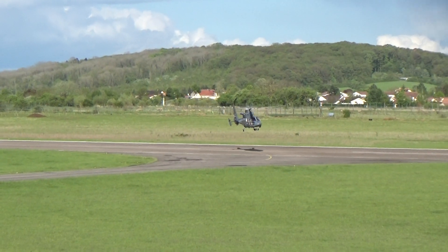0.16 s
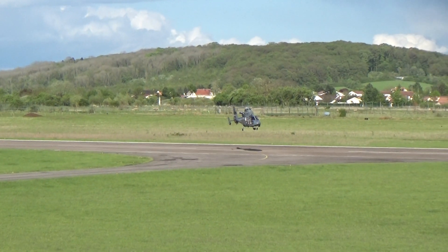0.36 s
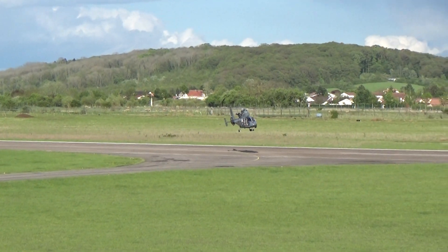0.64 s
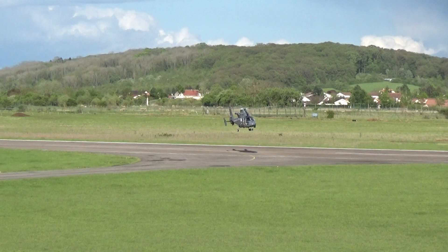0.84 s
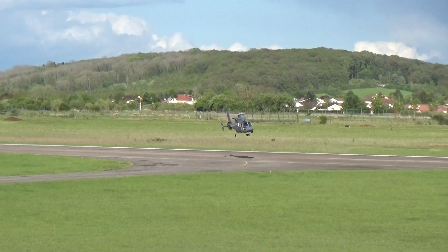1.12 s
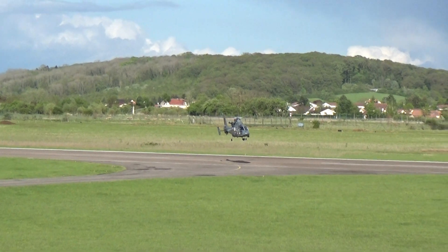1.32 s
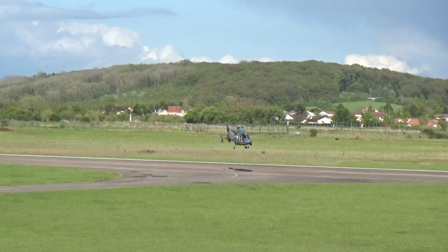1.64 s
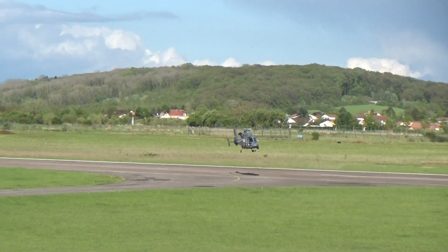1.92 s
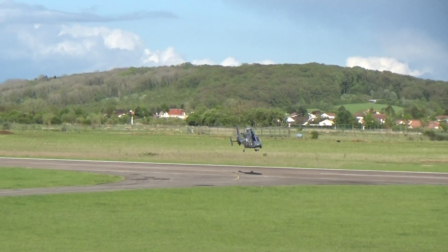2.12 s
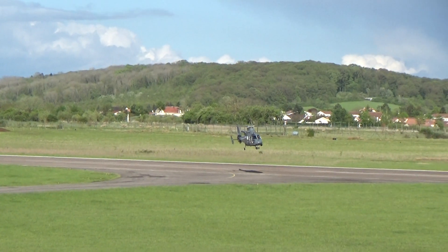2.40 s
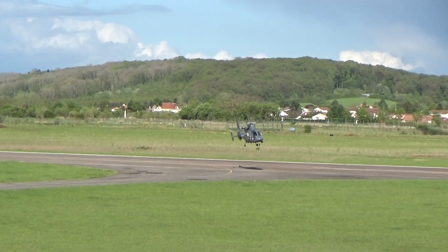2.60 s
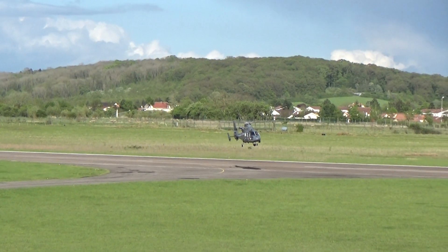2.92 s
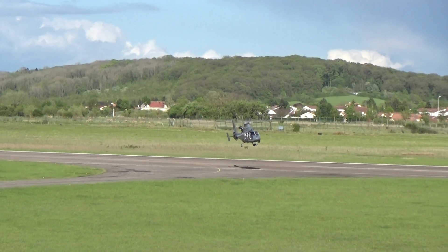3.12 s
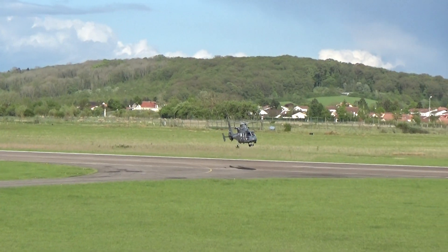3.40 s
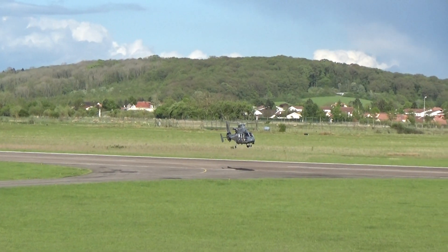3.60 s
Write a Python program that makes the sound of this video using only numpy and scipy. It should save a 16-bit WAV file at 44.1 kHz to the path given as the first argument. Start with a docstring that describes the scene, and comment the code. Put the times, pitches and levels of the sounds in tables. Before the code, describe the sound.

A helicopter hovers some way off, its blades beating rapidly over rushing air and a thin turbine whine. The blade slap is sharpest from about 0.6 to 1.2 seconds. Wind buffets the microphone throughout with uneven low thumps, swelling to a hard, crackling gust from 2.8 to 3.1 seconds; afterwards the sound is thinner and the helicopter quieter. A small bird chirps faintly around 2.2 seconds.

```python
"""An airfield, a turbine helicopter hovering low some way off. Its blades pass 24 times a second: a swish,
a slap as they cut their own wake, a dry tip rasp, over rotor wash, gear whine and turbine notes.
Wind eddies buffet the microphone and swell to one hard, crackling gust; wind and helicopter lose their
bass from there on. A small bird chirps faintly over hiss and ticks. A limiter holds the peaks."""
import sys
import numpy as np
from scipy import signal
from scipy.fft import rfft, irfft
from scipy.io import wavfile
from scipy.ndimage import uniform_filter1d

SR = 44100
rng = np.random.default_rng(int(sys.argv[2]) if len(sys.argv) > 2 else 0)


def log_audio(samples):
    """Write samples as a 16-bit WAV file to the path given in sys.argv[1]."""
    # one column per channel
    frames = np.atleast_2d(samples).T
    # limit to full scale, then quantise
    limited = np.clip(frames, -1, 1)
    pcm = np.round(limited * 32767).astype(np.int16)
    wavfile.write(sys.argv[1], SR, pcm)


N = 165375
TIME = np.arange(N) / SR
BLADE_HZ = 24.05

# blade swish peaks: time_s, level_db
SWISH_LEVEL = [(0, -30.5), (.15, -29.5), (.42, -38), (.6, -28), (.78, -25.5), (1.0, -27), (1.22, -25.5),
               (1.45, -30.5), (1.7, -28), (1.9, -33.5), (2.2, -30), (2.6, -34.5), (2.9, -30.5), (3.2, -42),
               (3.75, -36)]
# swish spectrum: freq_hz, level_db
SWISH_COLOUR = [(60, 5.5), (250, 4.5), (380, -5), (490, 7), (590, -9), (720, 5), (950, -1), (1150, -4),
                (1400, -7), (1650, -7), (1900, -9), (2800, -14), (4000, -28), (5000, -40.5), (8000, -52.5)]
# wake slap peaks: time_s, level_db
SLAP_LEVEL = [(.45, -48), (.62, -24), (.675, -18), (.78, -16.5), (.85, -25.5), (1.0, -24), (1.2, -41),
              (1.4, -35.5), (2.2, -65)]
# slap spectrum: freq_hz, level_db
SLAP_COLOUR = [(60, -15), (260, 14), (370, 2.5), (490, 12.5), (590, -16.5), (720, 12), (900, 2),
               (1200, -17), (2200, -32.5), (4500, -42.5), (8000, -65.5)]
# tip rasp peaks: time_s, level_db
TIP_LEVEL = [(.5, -73), (.8, -39), (.98, -34.5), (1.2, -38), (1.5, -57)]
# tip rasp spectrum: freq_hz, level_db
TIP_COLOUR = [(700, -33), (1200, -15), (1400, 4), (1680, 5), (1900, -21.5), (2700, -13.5), (5000, -49.5),
              (8000, -72.5)]
# rotor wash and engine noise: time_s, level_db
WASH_LEVEL = [(0, -45.5), (.3, -35.5), (.55, -35.5), (1.0, -34.5), (1.45, -36), (1.85, -39), (2.1, -32.5),
              (2.3, -35), (2.6, -34.5), (2.8, -38), (3.1, -43), (3.2, -41), (3.5, -46), (3.75, -42.5)]
# wash spectrum: freq_hz, level_db
WASH_COLOUR = [(25, 7.5), (60, -3), (120, 2), (250, -1), (400, -10.5), (550, -5), (750, -6), (1000, -5.5),
               (1130, -7.5), (1450, -11.5), (1850, -14.5), (2250, -16.5), (2600, -21.5), (3200, -29),
               (4200, -33), (5000, -46), (8000, -53)]
# gear tones: pitch_hz
GEAR_HZ = [1046, 1015, 1421, 1675]
# band of each gear tone: width_hz, relative_db
GEAR_BANDS = [(8.7, -4.5), (30.4, -5), (35, -13.5), (11.9, -14.5)]
# gear whine: time_s, level_db
GEAR_LEVEL = [(.4, -41.5), (.6, -48), (1.4, -49), (1.8, -42), (2.1, -36.5), (2.35, -40.5), (2.8, -42.5),
              (3.2, -51)]
# turbine note: time_s, level_db
TURBINE_LEVEL = [(0, -50), (.35, -62), (.45, -42.5), (.55, -54), (.7, -43), (.95, -60), (1.15, -49),
                 (1.5, -50.5), (1.9, -58), (2.3, -50.5), (2.45, -54), (2.72, -44.5), (2.95, -53.5),
                 (3.2, -56), (3.75, -60)]
# breathy band above it: time_s, level_db
TURBINE_TOP_LEVEL = [(0, -65), (.3, -57.5), (.8, -70), (1.7, -66), (2.1, -59.5), (2.65, -54.5), (3.2, -65),
                     (3.75, -63.5)]

# wind on the microphone: time_s, strength_db
WIND_LEVEL = [(0, -30.5), (.045, -33.5), (.095, -32.5), (.135, -18.5), (.17, -36), (.235, -29.5),
              (.28, -24.5), (.39, -25), (.47, -27.5), (.6, -29), (.85, -37), (1.0, -38.5), (1.235, -28),
              (1.275, -21.5), (1.315, -30), (1.39, -32), (1.47, -18.5), (1.6, -25.5), (1.65, -36),
              (1.7, -27.5), (1.83, -25), (1.89, -30), (1.97, -24.5), (2.12, -30.5), (2.17, -59),
              (2.265, -36.5), (2.29, -23.5), (2.35, -19), (2.505, -23.5), (2.53, -39), (2.73, -42),
              (2.79, -26.5), (2.85, -16), (3.125, -16), (3.24, -25), (3.36, -24), (3.41, -30.5),
              (3.47, -22.5), (3.53, -30.5), (3.6, -29.5), (3.65, -37), (3.68, -25), (3.75, -29.5)]
# wind spectrum: freq_hz, level_db
WIND_COLOUR = [(25, -4), (60, -2.5), (95, 0.5), (145, 0.5), (240, -2), (470, -9.5), (720, -20), (1200, -41),
               (2000, -44.5), (3500, -71), (8000, -103.5)]
# single eddies: start_s, level_db, pitch_hz
THUMPS = [(0.131, -10, 151), (0.331, -10, 129), (0.374, -13, 144), (1.076, -9, 131), (1.208, -9, 176),
          (1.263, -13.5, 160), (1.27, -11.5, 147), (1.285, -7.5, 155), (1.436, -12, 130),
          (1.455, -12.5, 158), (1.488, -11.5, 120), (1.578, -12, 146), (1.605, -11, 162),
          (1.687, -10.5, 151), (1.779, -9, 192), (1.827, -10.5, 111.5), (1.936, -20, 171),
          (1.983, -14.5, 135), (2.292, -10, 145), (2.805, -11.5, 88)]
# gust roar: time_s, level_db
ROAR_LEVEL = [(2.2, -47), (2.34, -35), (2.5, -27.5), (2.55, -58), (2.81, -42.5), (2.835, -19), (2.9, -26.5),
              (2.925, -15.5), (3.02, -17.5), (3.125, -14.5), (3.16, -25.5), (3.24, -33), (3.35, -29),
              (3.42, -44.5), (3.75, -53)]
# roar spectrum: freq_hz, level_db
ROAR_COLOUR = [(40, -40), (150, -0.5), (300, 2), (470, 0.5), (750, -10.5), (1270, -14.5), (1600, -29.5),
               (4000, -53), (8000, -77)]
# gust crackles: start_s, level_db
CRACKLES = [(2.863, -25), (2.875, -21.5), (3.069, -17.5)]
# crackle spectrum: freq_hz, level_db
CRACKLE_COLOUR = [(200, -20.5), (1200, 12), (3000, -12), (6000, -30.5), (9000, -54)]

# bird notes: start_s, length_s, from_hz, to_hz, level_db
CHIRPS = [(.165, 0.081, 5150, 5750, -65), (2.198, 0.046, 5200, 5720, -52), (3.33, 0.051, 5250, 5500, -69)]
# treble hiss: time_s, level_db
HISS_LEVEL = [(0, -65.5), (1.2, -67), (1.5, -68), (2.7, -67), (3.2, -68.5), (3.5, -68)]
# hiss spectrum: freq_hz, level_db
HISS_COLOUR = [(1000, -7), (5000, -0.5), (7000, 5), (8500, -2.5), (11000, -5), (13000, -3.5),
               (16000, -14.5)]
# electronic tones: pitch_hz, level_db
ELECTRONIC_TONES = [(13119, -93), (15625, -95.5)]
# faint close ticks: start_s, level_db
TICKS = [(.273, -63), (.39, -59), (.63, -58.5), (.69, -61), (2.929, -61.5), (3.476, -59), (3.604, -61),
         (3.677, -59), (3.704, -62)]
# tick spectrum: freq_hz, level_db
TICK_COLOUR = [(3000, -36), (5500, -17), (7000, -4), (9500, -15), (12500, -14), (16000, -33)]

# low edge of wind and helicopter: time_s, cutoff_hz
LOW_EDGE = [(0, 28), (2.2, 31.6), (2.42, 89.4), (2.6, 60.7), (2.8, 48.8), (2.95, 270), (3.3, 294),
            (3.75, 210)]
# stereo width: freq_hz, side_minus_mid_db
STEREO_WIDTH = [(60, -24), (150, -35), (300, -18.5), (1000, -25.5), (2500, -20), (5000, -23.5),
                (8000, -9.5), (12000, -19)]
# microphone port balance: freq_hz, left_minus_right_db
PORT_BALANCE = [(60, -1), (125, -1), (300, 1.9), (600, 0.5), (1100, 1.13), (2200, 1.44), (4000, -0.5)]


def helicopter():
    """Wash, gears and turbine under the swish, wake slap and tip rasp of the blades."""
    steady = rotor_wash() + gear_whine() + turbine()
    swish = blades(SWISH_LEVEL, SWISH_COLOUR, attack_s=.011, decay_s=.013, repeat_share=.28)
    slap = blades(SLAP_LEVEL, SLAP_COLOUR, attack_s=.0035, decay_s=.0062, repeat_share=.6)
    tips = blades(TIP_LEVEL, TIP_COLOUR, attack_s=.011, decay_s=.028, repeat_share=.28)
    return steady + swish + slap_sweep(slap) + tips


def blades(level, colour, attack_s, decay_s, repeat_share, peak_after_s=.0054, jitter_s=.0007):
    """One burst per blade pass: part repeating pressure wave, part fresh turbulence."""
    pass_s = .0002 + np.arange(int(N / SR * BLADE_HZ) + 1) / BLADE_HZ
    late, louder = rng.standard_normal((len(pass_s), 2)).T
    start_s = pass_s + peak_after_s - attack_s + jitter_s * late
    peak_db = np.interp(pass_s, *np.transpose(level)) + .7 * louder
    repeating = np.resize(rng.standard_normal(int(SR / BLADE_HZ)), N)
    source = np.sqrt(repeat_share) * repeating + np.sqrt(1 - repeat_share) * rng.standard_normal(N)
    eddies = from_db(4.5 * np.tanh(drift(340)))
    rasp = evened(coloured(colour, source * eddies), share=.6, window_samples=500)
    return rasp * bursts(zip(start_s, peak_db), attack_s, decay_s)


def slap_sweep(x, s_per_octave=.00247):
    """Midrange dispersion: the bass of a slap arrives before its treble."""
    hz = np.fft.rfftfreq(N, 1 / SR)
    delay_s = s_per_octave * np.log2(np.clip(hz, 200, 1400) / 750)
    return irfft(rfft(x) * np.exp(-2j * np.pi * np.cumsum(delay_s) * SR / N), N)


def rotor_wash(flutter_db=1.4):
    """Broadband downwash and engine noise, lightly fluttering."""
    return coloured(WASH_COLOUR) * from_db(in_time(WASH_LEVEL) + flutter_db * drift(21))


def gear_whine(flutter_db=4):
    """Four narrow gear tones, fluttering on the moving air."""
    tones = sum(from_db(db) * wavering(hz, width_hz) for hz, (width_hz, db) in zip(GEAR_HZ, GEAR_BANDS))
    flutter = rms_one(from_db(flutter_db * np.tanh(drift(35))))
    return tones * from_db(in_time(GEAR_LEVEL)) * flutter


def turbine():
    """A smeared high note and a breathy band above it, both wandering in pitch."""
    note = from_db(in_time(TURBINE_LEVEL)) * wavering(2155, width_hz=56, wander_hz=22)
    top = from_db(in_time(TURBINE_TOP_LEVEL)) * wavering(3170, width_hz=125, wander_hz=22)
    return note + top


def wind(ceiling=.55):
    """Buffeting, thumps and roar saturate the microphone ports; the hardest gust crackles."""
    pressure = thin_bass(buffeting() + thumps() + gust_roar())
    drive = uniform_filter1d(np.abs(signal.hilbert(pressure[0])) / ceiling, size=200)
    saturated = pressure / (1 + drive ** 4) ** .25
    crackles = coloured(CRACKLE_COLOUR) * bursts(CRACKLES, attack_s=.001, decay_s=.0048)
    return saturated + crackles


def buffeting(full_gust_db=-10, knee_hz=196, pivot_db=-21):
    """Port turbulence, octave by octave: lumpy when light, dense and brighter when strong."""
    strength_db = in_time(WIND_LEVEL)
    noise = coloured(WIND_COLOUR)
    lump_db = .63 * np.clip(full_gust_db - strength_db, 0, 10)
    strength_db += lump_db * np.tanh(drift(25))
    tilt_db_per_octave = .54 * (strength_db - pivot_db)
    out, below = 0, 0
    for hz in 125 * 2 ** np.arange(7):
        lowpassed = signal.sosfiltfilt(signal.butter(2, hz * np.sqrt(2), fs=SR, output="sos"), noise)
        band = evened(lowpassed - below, share=.75, window_samples=900)
        below = lowpassed
        octaves = np.clip(np.log2(hz / knee_hz), 0, 6.4)
        out = out + band * from_db(strength_db + tilt_db_per_octave * octaves)
    return out


def thumps(rise_cycles=.48):
    """Each eddy pushes the diaphragm through a couple of low swings."""
    out = np.zeros(N)
    for start_s, db, hz in THUMPS:
        cycles = np.clip((TIME - start_s) * hz, 0, 20)
        swell = cycles / rise_cycles
        envelope = swell ** 2 * np.exp(2 * (1 - swell))
        out += from_db(db) * envelope * np.sin(2 * np.pi * cycles)
    return out


def gust_roar():
    """Hollow roar of the strongest gusts across the ports."""
    return from_db(in_time(ROAR_LEVEL)) * evened(coloured(ROAR_COLOUR), share=.75, window_samples=600)


def bird(waver_hz=40):
    """Short thin notes that rise, then sag."""
    out = np.zeros(N)
    for start_s, length_s, from_hz, to_hz, db in CHIRPS:
        along = np.clip((TIME - start_s) / length_s, 0, 1)
        hz = from_hz + (to_hz - from_hz) * np.sin(2.4 * along) ** 2 + waver_hz * drift(200)
        envelope = np.sin(np.pi * along) ** 2
        out += from_db(db) * envelope * np.sin(2 * np.pi * np.cumsum(hz) / SR)
    return out


def noise_floor():
    """Hiss, thin electronic tones, small ticks."""
    hiss = from_db(in_time(HISS_LEVEL)) * coloured(HISS_COLOUR)
    tones = sum(from_db(db) * np.sqrt(2) * np.sin(2 * np.pi * hz * TIME) for hz, db in ELECTRONIC_TONES)
    ticks = coloured(TICK_COLOUR) * bursts(TICKS, attack_s=.005, decay_s=.011)
    return hiss + tones + ticks


def thin_bass(x, block_samples=147):
    """Second-order high-pass following LOW_EDGE."""
    cutoff_hz = in_time(LOW_EDGE)
    out, state = np.zeros_like(x), np.zeros((2, 2))
    for i in range(0, N, block_samples):
        block = slice(i, i + block_samples)
        k = np.tan(np.pi * cutoff_hz[i] / SR)
        feedback = [1 + np.sqrt(2) * k + k * k, 2 * (k * k - 1), 1 - np.sqrt(2) * k + k * k]
        out[:, block], state = signal.lfilter([1, -2, 1], feedback, x[:, block], zi=state)
    return out


def ports(x):
    """Left and right ports differ slightly in colour."""
    db = at_hz(PORT_BALANCE, np.fft.rfftfreq(N, 1 / SR))
    return irfft(rfft(x) * from_db(np.array([db, -db]) / 2), N)


def wavering(hz, width_hz, wander_hz=0):
    """Narrow-band tone, centre free to wander, rms about 1."""
    phase = 2 * np.pi * np.cumsum(hz + wander_hz * drift(5.91)) / SR
    return drift(width_hz) * np.cos(phase) + drift(width_hz) * np.sin(phase)


def coloured(colour, source=None):
    """Near-mono shaped noise, rms 1; source, if given, is the mid signal."""
    hz = np.fft.rfftfreq(N, 1 / SR)
    mid, side = rfft(rng.standard_normal((2, N)))
    if source is not None:
        mid = rfft(source)
    side = side * from_db(at_hz(STEREO_WIDTH, hz)) * [[1], [-1]]
    return rms_one(irfft((mid + side) * from_db(at_hz(colour, hz)), N))


def bursts(events, attack_s, decay_s):
    """Power-summed event envelopes: sine rise, exponential fall."""
    power = np.zeros(N)
    for start_s, db in events:
        first = max(int(start_s * SR), 0)
        age_s = np.maximum(TIME[first:first + SR // 10] - start_s, 0)
        rise = np.sin(np.pi / 2 * np.minimum(age_s / attack_s, 1))
        fall = np.exp(-np.maximum(age_s - attack_s, 0) / decay_s)
        power[first:first + len(age_s)] += (from_db(db) * rise * fall) ** 2
    return np.sqrt(power)


def evened(x, share, window_samples):
    """Flatten a share of a noise's chance swells."""
    power = uniform_filter1d(np.mean(x ** 2, axis=0), window_samples)
    power = uniform_filter1d(power, window_samples) + 1e-20
    return x * (power.mean() / power) ** (share / 2)


def drift(rate_hz, points=11025):
    """Low-passed random wander, rms 1."""
    hz = np.fft.rfftfreq(points, N / SR / points)
    slow = irfft(rfft(rng.standard_normal(points)) / (1 + (hz / rate_hz) ** 2), points)
    return rms_one(np.interp(TIME, np.linspace(0, N / SR, points), slow))


def in_time(rows):
    """Control curve, per sample."""
    return np.interp(TIME, *np.transpose(rows))


def at_hz(rows, hz):
    """Spectrum in dB, interpolated over log frequency."""
    freq_hz, db = np.transpose(rows)
    return np.interp(np.log(hz + 1e-9), np.log(freq_hz), db)


def from_db(db):
    """Decibels to gain."""
    return 10 ** (np.asarray(db) / 20)


def rms_one(x):
    """Scale to unit power."""
    return x / np.sqrt(np.mean(x ** 2) + 1e-20)


def scene():
    """Helicopter ahead, wind on the microphone, faint bird, noise floor."""
    return ports(thin_bass(helicopter()) + wind() + bird()) + noise_floor()


def record(dry, limit_db=-12, release_db_per_s=73, cutoff_hz=16400):
    """Peak limiter, then a steep low-pass."""
    peak_db = 20 * np.log10(np.abs(dry).max(axis=0) + 1e-9)
    over_db = np.maximum(peak_db - limit_db, 0)
    release_db = release_db_per_s * TIME
    duck_db = np.maximum.accumulate(over_db + release_db) - release_db
    limited = dry * from_db(-uniform_filter1d(duck_db, size=90))
    return signal.sosfilt(signal.ellip(10, .1, 80, cutoff_hz, fs=SR, output="sos"), limited)


dry = scene()
out = record(dry)
log_audio(out)
```